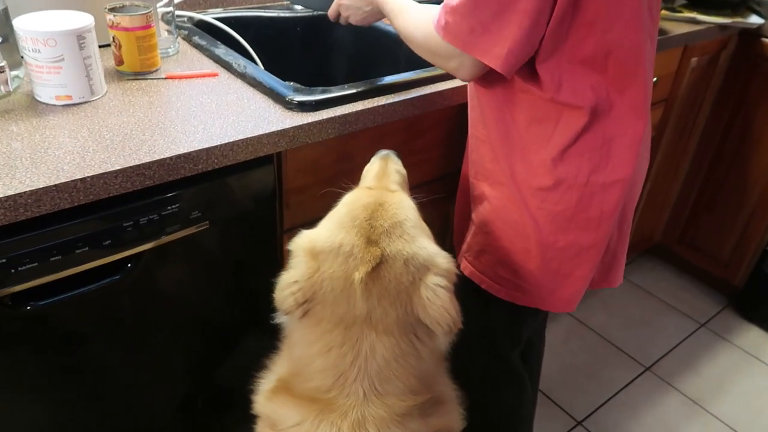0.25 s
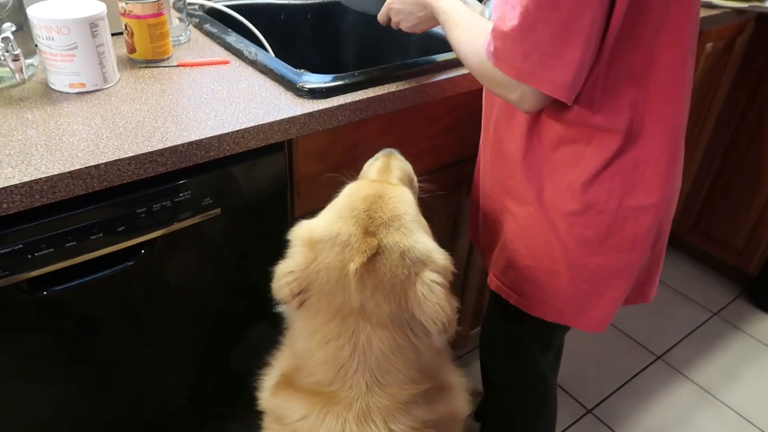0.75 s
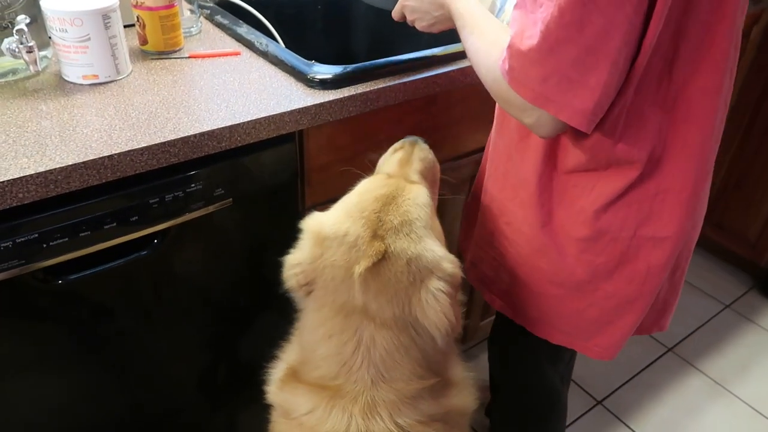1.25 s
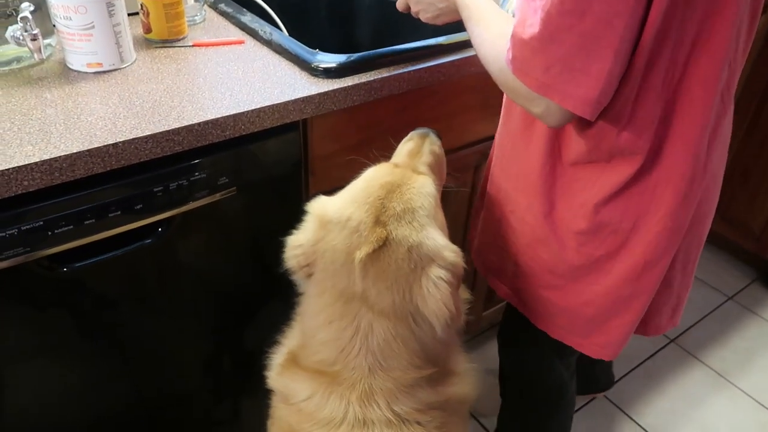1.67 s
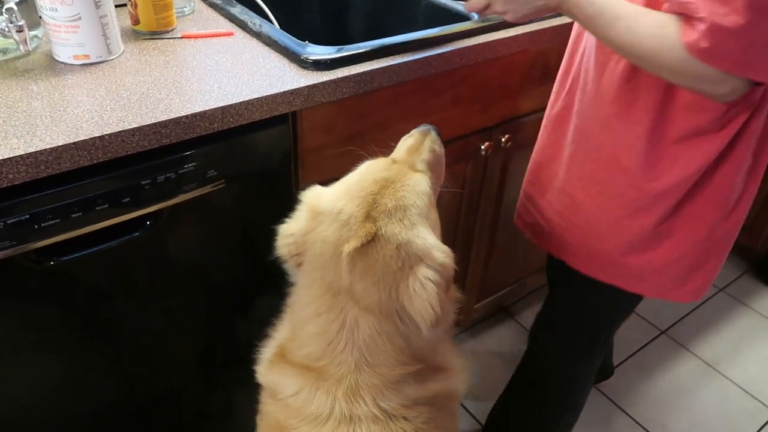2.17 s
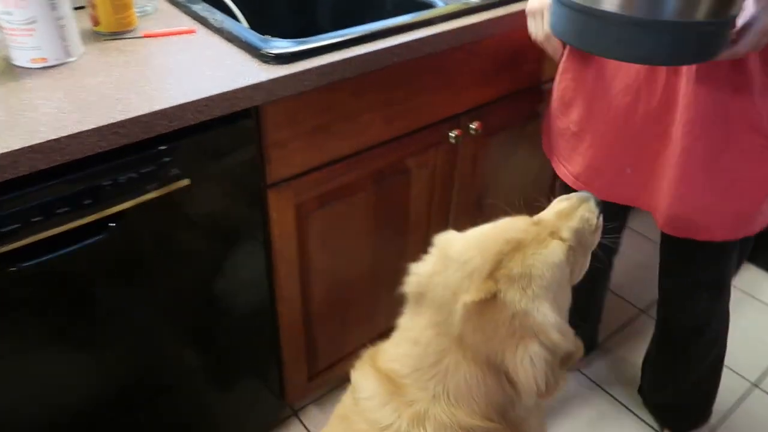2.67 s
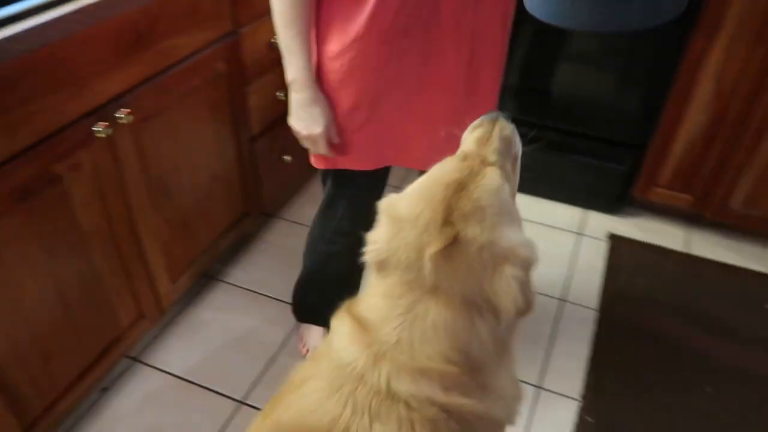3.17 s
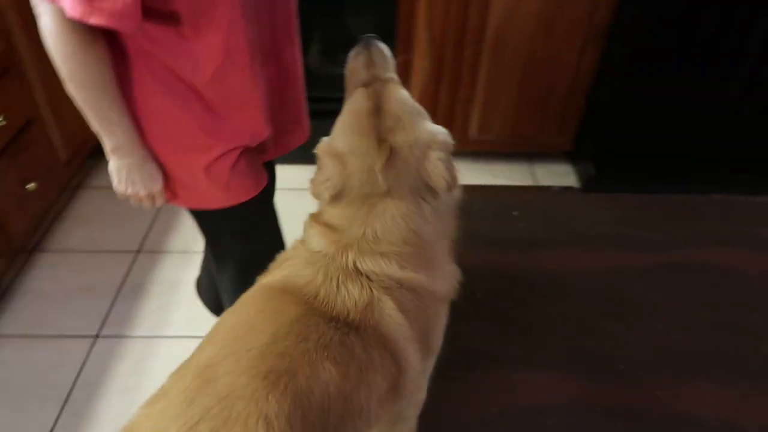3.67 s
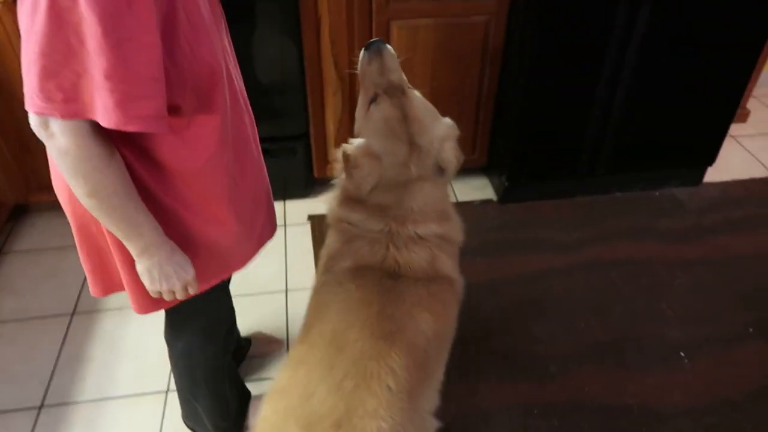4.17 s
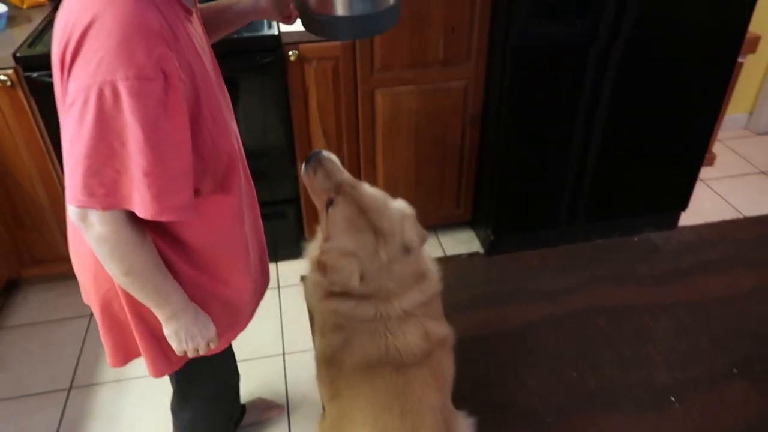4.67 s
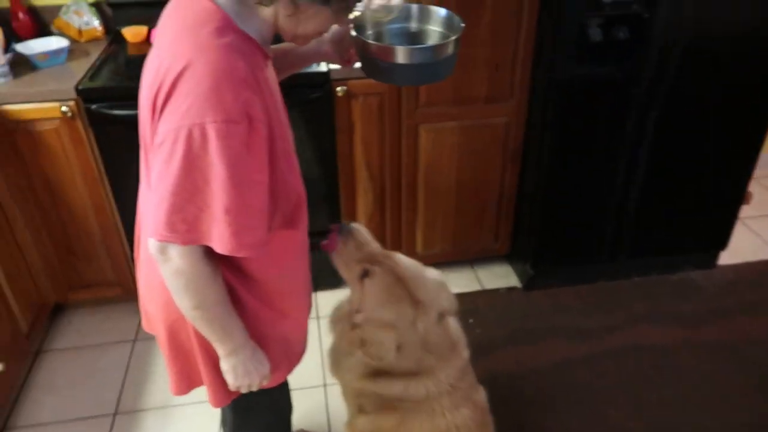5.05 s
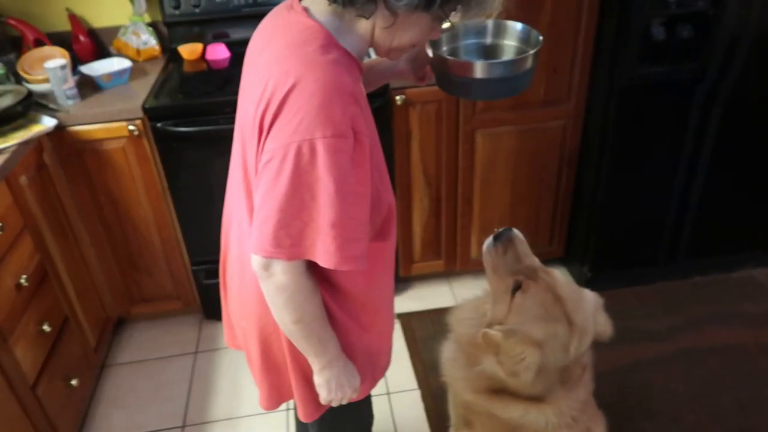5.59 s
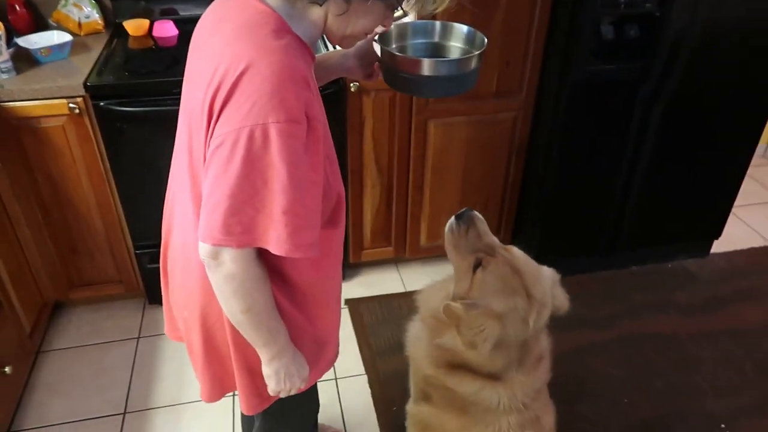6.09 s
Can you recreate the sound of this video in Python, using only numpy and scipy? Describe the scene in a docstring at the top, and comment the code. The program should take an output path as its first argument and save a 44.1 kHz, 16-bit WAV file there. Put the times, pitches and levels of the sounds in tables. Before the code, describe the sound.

A splashing tap cuts off almost at once, leaving a thin drain and a faint low ringing bowl tone. Steel rubs grittily along the sink, catches, skids and squeaks; a short pause, then two bright, hollow clanks, the second stronger. The rest is quiet: soft thuds of feet and paws, scuffs, swishing clothes, refrigerator hum and deep microphone rumble, with short reflections of a tiled kitchen, in wide stereo.

```python
"""A steel dog bowl scrapes and squeaks along a kitchen sink, then clanks twice against it as it is lifted out.
The scrape is filtered click noise, the squeak a wavering tone, each clank a set of fading tones with a rattle.
At first a tap splashes into the bowl (grainy noise) and is shut off. Bare feet and a dog's paws pad and scuff
over the tiles (short tones and noise bursts); cloth and fur rustle (soft noise). A refrigerator hums (sine
and noise) over a deep rumble (low noise); echoes of a small hard room follow all but these two."""
import sys
import numpy as np
from scipy import signal
from scipy.fft import rfft, irfft, next_fast_len
from scipy.io import wavfile
from scipy.ndimage import uniform_filter1d, map_coordinates

SR = 44100
rng = np.random.default_rng(int(sys.argv[2]) if len(sys.argv) > 2 else 0)


def log_audio(samples):
    """Write samples as a 16-bit WAV file to the path given in sys.argv[1]."""
    # one column per channel
    frames = np.atleast_2d(samples).T
    # limit to full scale, then quantise
    limited = np.clip(frames, -1, 1)
    pcm = np.round(limited * 32767).astype(np.int16)
    wavfile.write(sys.argv[1], SR, pcm)


N = 278844

# the bowl lands rim first and rebounds once:
# t/s, rim level/dB, body level/dB, body tilt/(dB per octave), flight/s, rebound level/dB
CLANKS = [(2.191, -18, -12, 0.8, 0.037, -7), (2.351, -8.5, -10, 1, 0.054, -14)]
# light touches around the second clank: t/s, level/dB, tilt/(dB per octave)
GRAZES = [(2.29, -42, 6.5), (2.339, -22.5, 0.5), (2.459, -32, 7.5), (2.467, -22, -4)]
# tones of bowl and sink together: f/Hz, level when flat/dB, level when tipped/dB
STEEL_TONES = [(169, -8, -14), (284, 2.5, -5), (357.7, 3, -3), (484, -9.5, -3.5), (613.5, -6, -5.5),
               (720, 3.5, 4.5), (823, -3, -6.5), (883, -7, -1), (934, -4, -0.5), (1497, -16, -14),
               (1739, -15, -14), (1906, -19, -8.5), (2235, -10.5, -17), (3020, -27, -18), (5200, -33, -23),
               (6100, -22, -18.5), (7500, -18.5, -21), (13590, -22, -31)]
# colour of the sheet-metal rattle: f/Hz, level/dB
CLATTER_COLOUR = [(70, -34), (230, 1.5), (750, 3.5), (1250, -3), (2000, -5.5), (4000, -12), (8500, -30.5),
                  (10500, -23), (15500, -42)]
TIPPED_S = 2.32  # the bowl is tipped in the hand after this moment
BODY_LAG_S = 0.0035  # the body rings this long after the rim lands

# the wet rim sticks and slips: t/s, length/s, highest mean pitch f/Hz, level/dB
SQUEAKS = [(1.271, 0.0333, 1958, -19.5), (1.4, 0.054, 2000, -38)]
# partials of the squeak: multiple of the pitch, level/dB
SQUEAK_PARTIALS = [(1, 1.5), (3, 6.5), (4, -5), (6, 3), (7, -3)]
# the rim rings on as it comes free
LIFT_HZ, LIFT_RING_DB, LIFT_T60_S = 4570, -49, 0.22

# pushes of the bowl along the sink: t/s, rise/s, level/dB
PUSHES = [(0.655, 0.007, -34.5), (0.782, 0.031, -32), (0.864, 0.027, -27), (1.271, 0.0052, -33)]
# each push dies away; the rubbing ends as the bowl lifts off
COAST_DB_PER_S, LIFT_S, LIFT_DB_PER_S = 38.5, 1.502, 296
# colour of steel sliding on the sink: f/Hz, level/dB
RASP_COLOUR = [(150, -12), (650, -1), (950, -6), (3200, -2), (4500, -4), (7300, -3.5), (9000, -17.5),
               (11500, -6), (15500, -38)]
# the rim catches and grates: t/s, level/dB
CATCHES = [(1.052, -17), (1.071, -22), (1.094, -23), (1.107, -21.5)]
# resonances of the rim: f/Hz, width/Hz, level/dB
RIM_RESONANCES = [(1630, 580, -11), (2480, 190, -3.5), (3020, 260, 1), (4020, 1030, -7.5), (5400, 1300, -9),
                  (6980, 630, -4.5), (10640, 780, -12)]
# the last catch skids to a stop, its pitch sinking
SKID_S, SKID_LENGTH_S, SKID_FROM_HZ, SKID_TO_HZ, SKID_DB = 1.109, 0.026, 3200, 1146, -28

# one low tone of the bowl, set going by the jet
SING_HZ, SING_DB, SING_T60_S = 588, -45, 3.4

# the jet runs at full flow until the tap is shut; the last water then drains away
JET_DB, SHUT_S, SHUT_DB_PER_S = -31, 0.16, 240
DRAIN_DB, DRAIN_DB_PER_S = -47.5, 19
# colour of the splash: f/Hz, level/dB
SPLASH_COLOUR = [(100, 0), (1000, 5), (2500, 5), (4000, 1.5), (7000, 1), (9000, -6), (11500, -2),
                 (15500, -25)]

# soft knocks of tap handle, bowl, feet and paws: t/s, ring level/dB, body f/Hz, puff level/dB
THUDS = [(0.094, -35, 299, -38.5), (0.181, -34, 597, -32.5), (0.199, -31.5, 350, -35),
         (0.222, -30, 113, -42), (0.572, -38.5, 372, -46.5), (0.882, -49, 570, -41.5),
         (3.347, -41.5, 623, -42.5), (3.499, -38.5, 727, -42.5), (3.721, -30.5, 609, -39),
         (3.748, -38, 694, -42.5), (4.11, -40, 770, -36.5), (4.541, -28.5, 823, -32),
         (4.573, -31.5, 730, -37), (4.632, -32, 370, -38.5), (4.683, -34.5, 701, -43),
         (4.873, -38, 803, -45), (5.146, -36, 663, -40.5), (5.205, -38, 1193, -38),
         (5.592, -35.5, 580, -38.5), (6.142, -42.5, 1155, -34.5), (6.187, -30, 475, -38.5),
         (6.262, -37, 371, -58)]
# colour of the dull puff in a knock: f/Hz, level/dB
THUD_COLOUR = [(60, -51), (350, 9), (800, 6), (3000, -7.5), (4500, -18), (11000, -26), (13000, -65)]
# brushes of rim, soles, claws and cloth, and one dribble of water just after the tap is shut, # levels before a
# shared gain: t/s, level/dB, body f/Hz, resonance level/dB, treble level/dB
SCUFFS = [(0.255, -26.5, 2670, 3, -9), (2.64, -23, 4470, 0.5, 20), (2.662, -30, 3040, -1, -2),
          (2.961, -32.5, 2260, 4, 13), (3.02, -26.5, 1380, 10, -21), (3.042, -22.5, 6500, 3.5, 9),
          (3.272, -30, 1297, -1, -41), (3.407, -32.5, 2700, 1, 10), (3.717, -28.5, 1710, 9.5, -3),
          (3.747, -33, 3900, 8, 17), (4.138, -23.5, 2060, 4.5, -12), (4.208, -20.5, 1150, 2.5, -23.5),
          (4.529, -30, 3400, 9.5, -16), (4.635, -31.5, 1500, -5, 2), (4.871, -25, 1930, 14, -25),
          (5.622, -37.5, 2860, 16, -4), (5.69, -31, 2510, 4.5, -5)]
# shared colour of the brushes: f/Hz, level/dB
SCUFF_COLOUR = [(150, -64), (600, 2), (2300, 4), (4000, -3.5), (7000, -7), (9000, -19.5), (11000, -4.5),
                (13500, -75)]

# the rustle is fullest between these two moments and slowly weaker on either side
FULL_FROM_S, FULL_UNTIL_S, RUSTLE_DB, RUSTLE_FADE_DB_PER_S = 3.5, 4.4, -45, 1.5
# colour of the low rustle: f/Hz, level/dB
RUSTLE_COLOUR = [(40, -22), (150, 6.5), (330, 7), (2300, -11), (11000, -37), (13000, -70)]
# colour of the cloth hiss: f/Hz, level/dB
CLOTH_COLOUR = [(1000, 1), (11000, -2), (13000, -71)]
# clothes swish with a stride: middle t/s, level/dB
SWISHES = [(3.17, -48.5), (3.61, -45.5), (4.81, -50.5)]
SWISH_FADE_S = 0.057  # time constant on either side of the middle

HUM_HZ, HUM_DB = 118.7, -52.5
LOUDER_S, LOUDER_DB = 3.72, 3.5  # the hum steps up by this much here
# colour of the fan air: f/Hz, level/dB
AIR_COLOUR = [(60, -53), (200, 1.5), (350, -8), (600, -43), (1200, -20), (3000, -24.5), (10500, -33.5),
              (13000, -51)]
RUMBLE_DB, LULL_S, LULL_DB = -49.5, (1.48, 2.46), -6.5  # the rumble, and a dip in it from-to
# colour of the deep rumble: f/Hz, level/dB
RUMBLE_COLOUR = [(20, -33), (50, -0.5), (75, -9.5), (110, -7), (500, -43.5)]

# how long the room rings: f/Hz, time to fall by 60 dB/s
ROOM_T60 = [(150, 0.45), (7000, 0.31), (14000, 0.23)]
# stereo width: f/Hz, side minus mid level/dB, before the room's and sources' own balance
STEREO_WIDTH = [(40, -54), (200, -9), (1000, -8), (4400, -4.5), (8000, 2.5), (12000, 12.5)]
TOP_HZ = 15730  # nothing is kept from here up


def clanks(attack=0.0019, ring_t60=0.21, treble_hold=0.086, flutter_db=1.0, twin_db=-6):
    """Each blow rings the steel's tones, as beating pairs, over a short rattling clatter of sheet metal."""
    out, t = np.zeros(N), np.arange(SR // 2) / SR
    hz, flat_db, tipped_db = np.transpose(STEEL_TONES)[:, :, None]
    t60 = ring_t60 * (hz / 1000) ** treble_hold  # the hand damps the low tones most
    unrest = np.sqrt(hz / 8000)  # high tones waver most

    def drift():
        return unrest * np.array([wobble(60, len(t)) for _ in STEEL_TONES])

    for s, ring_db, clatter_db, slope_db, clatter_t60 in blows():
        mode_db = tipped_db if s > TIPPED_S else flat_db
        twin_hz = hz * (1 + 0.014 * rng.standard_normal(hz.shape))
        main_tone = np.sin(2 * np.pi * hz * t + drift())
        twin_tone = np.sin(2 * np.pi * twin_hz * t + drift())
        pairs = main_tone + amp(twin_db) * twin_tone
        fading = amp(mode_db + flutter_db * drift() - 60 * t / t60)
        ring = np.sum(fading * pairs * tilt(hz, slope_db), axis=0)
        rattle = patchy(grit(len(t), rate=350, depth_db=1.5), depth_db=3.5, size=1024)
        clatter = unit(filtered(rattle, lambda f: amp(along(CLATTER_COLOUR, f)) * tilt(f, slope_db)))
        blow = amp(ring_db - 7.5) * ring + amp(clatter_db - 60 * t / clatter_t60) * clatter
        add(out, s, blow * (1 - np.exp(-t / attack)))
    return out


def blows(rim_ring_db=-11, rim_tilt_db=1.0, rim_t60=0.057, body_clatter_db=-5.0, body_t60=0.16,
          rebound_clatter_db=-4):
    """List the contacts of each clank: the rim cracks, the body rings, the rebound rattles."""
    # t/s, ring level/dB, clatter level/dB, tilt/(dB per octave), clatter t60/s
    rows = [(s, db + rim_ring_db, db, slope_db, body_t60) for s, db, slope_db in GRAZES]
    for s, rim_db, body_db, slope_db, flight, rebound_db in CLANKS:
        back_db = body_db + rebound_db
        body_s = s + BODY_LAG_S
        rows += [(s, rim_db + rim_ring_db, rim_db, rim_tilt_db, rim_t60),
                 (body_s, body_db, body_db + body_clatter_db, slope_db, body_t60),
                 (body_s + flight, back_db, back_db + rebound_clatter_db, slope_db, body_t60)]
    return rows


def squeak(sizzle_db=-3, rise=0.025, release_db_per_s=330, slack=0.02):
    """The wet rim sticks and slips: an unsteady shrill tone, highest in mid-stroke, with a high sizzle."""
    out = np.zeros(N)

    def highs(f):
        lower = resonance(f, 6500, 1050) - resonance(f, 7440, 390)
        return lower + 0.5 * resonance(f, 10300, 900) - 0.11 * resonance(f, 15200, 900)

    loudest_db = max(row[-1] for row in SQUEAKS)
    for s, length, hz, level_db in SQUEAKS:
        pressure = np.sin(np.pi * np.minimum(since(s) / length, 1))
        pitch_hz = hz * (1 - slack * (1 - pressure))
        phase = 2 * np.pi * np.cumsum(pitch_hz * (1 + 0.011 * wobble(600))) / SR
        # under light pressure the low partials fade and the shrill ones remain
        grip_db = 1.1 * (level_db - loudest_db)
        tone = unit(sum(amp(db + grip_db / k + 1.3 * wobble(220)) * np.sin(k * phase)
                        for k, db in SQUEAK_PARTIALS))
        sizzle = unit(filtered(patchy(rng.standard_normal(N), depth_db=4), highs))
        gain = amp(level_db) * stroke(s, rise, length, release_db_per_s)
        out += gain * (tone + amp(sizzle_db) * sizzle)
    return out


def lift_ring():
    """The rim comes free and rings on as one fading tone."""
    free = since(LIFT_S)
    return amp(LIFT_RING_DB - 60 * free / LIFT_T60_S) * np.sin(2 * np.pi * LIFT_HZ * free)


def scrape(catch_t60=0.21):
    """Steel slides grittily over the sink; where the rim catches, its resonances grate."""
    power = sum((amp(db) * stroke(s, rise, rise, COAST_DB_PER_S)) ** 2 for s, rise, db in PUSHES)
    effort = np.sqrt(power)
    friction = patchy(slips(N, rate=1800, spread_db=3), depth_db=3.6)
    slide = unit(filtered(friction, lambda f: amp(along(RASP_COLOUR, f))))
    t = np.arange(SR // 4) / SR
    catch_power = np.zeros(N)
    for s, db in CATCHES:
        add(catch_power, s, amp(db - 60 * t / catch_t60) ** 2)

    def rim(f):  # neighbouring resonances have opposite signs
        return sum((-1) ** k * amp(db) * resonance(f, hz, width)
                   for k, (hz, width, db) in enumerate(RIM_RESONANCES))

    chatter = patchy(grit(N, rate=600, depth_db=2.5), depth_db=2.5)
    grating = np.sqrt(catch_power) * unit(filtered(chatter, rim))
    return slide * effort * amp(-LIFT_DB_PER_S * since(LIFT_S)) + grating


def skid(fall_s=0.019):
    """Ragged stick and slip that slows down as the rim comes to rest."""
    pitch_hz = SKID_TO_HZ + (SKID_FROM_HZ - SKID_TO_HZ) * np.exp(-since(SKID_S) / fall_s)
    phase = 2 * np.pi * np.cumsum(pitch_hz) / SR
    rasp = wobble(500) * np.sin(phase + 1.5 * wobble(700))
    return amp(SKID_DB) * unit(rasp) * stroke(SKID_S, 0.0027, SKID_LENGTH_S, 350)


def sing():
    """The jet has set one low tone of the bowl singing; it fades slowly."""
    t = np.arange(N) / SR
    return amp(SING_DB - 60 * t / SING_T60_S) * np.sqrt(2) * np.sin(2 * np.pi * SING_HZ * t)


def tap():
    """The jet splashes in the bowl until the tap is shut; the last water drains away."""
    drops = patchy(grit(N, rate=1100, depth_db=3), depth_db=2.5)
    splash = unit(filtered(drops, lambda f: amp(along(SPLASH_COLOUR, f))))
    jet = amp(JET_DB - SHUT_DB_PER_S * since(SHUT_S))
    drain = amp(DRAIN_DB - DRAIN_DB_PER_S * since(SHUT_S))
    return splash * np.hypot(jet, drain)


def thuds(attack=0.0022, ring_t60=0.084, puff_t60=0.26, waver=1.33):
    """Soft knocks: the struck body rings briefly and unsteadily under a dull puff."""
    out, t = np.zeros(N), np.arange(SR // 3) / SR
    for s, ring_db, body_hz, puff_db in THUDS:
        ring = unit(np.sin(2 * np.pi * body_hz * t + waver * wobble(body_hz / 5, len(t))))
        clicks = slips(len(t), rate=3000, spread_db=2)
        puff = unit(filtered(clicks, lambda f: amp(along(THUD_COLOUR, f))))
        add(out, s, amp(ring_db) * ring * burst(t, attack, ring_t60))
        add(out, s, amp(puff_db) * puff * burst(t, attack, puff_t60))
    return out


def scuffs(gain_db=-9.0, attack=0.0041, t60=0.16, width_octaves=0.19):
    """Brushing contacts and one dribble of water: short gritty bursts, each with a resonance at its own body
    pitch."""
    out, t = np.zeros(N), np.arange(SR // 3) / SR
    for s, db, body_hz, body_db, treble_db in SCUFFS:
        def colour(f):
            hump = np.exp(-(np.log2((f + 1) / body_hz) / width_octaves) ** 2)
            return amp(along(SCUFF_COLOUR, f) + treble_db * f / (f + 3000) + body_db * hump)

        grains = patchy(slips(len(t), rate=3500, spread_db=2), depth_db=2.5)
        add(out, s, amp(db + gain_db) * unit(filtered(grains, colour)) * burst(t, attack, t60))
    return out


def tick(s=5.063, db=-30, t60=0.0019, centre_hz=6000):
    """One tiny dry tick: a very short burst of noise through one broad resonance."""
    out, t = np.zeros(N), np.arange(SR // 20) / SR
    noise = rng.standard_normal(len(t))
    snap = unit(filtered(noise, lambda f: resonance(f, centre_hz, centre_hz / 2)))
    add(out, s, amp(db - 60 * t / t60) * snap)
    return out


def shuffle(cloth_db=-64):
    """Fur, clothes and feet rustle as soft noise; now and then a stride swishes."""
    t = np.arange(N) / SR
    outside_s = np.maximum(FULL_FROM_S - t, 0) + since(FULL_UNTIL_S)
    rustle = patchy(grit(N, rate=60, depth_db=1.8), depth_db=3.3)
    low = unit(filtered(rustle, lambda f: amp(along(RUSTLE_COLOUR, f))))
    hiss = unit(filtered(rng.standard_normal(N), lambda f: amp(along(CLOTH_COLOUR, f))))
    swish = sum(amp(db) * np.exp(-np.abs(t - s) / SWISH_FADE_S) for s, db in SWISHES)
    rubbing = low * amp(RUSTLE_DB) + hiss * amp(cloth_db)
    return rubbing * amp(-RUSTLE_FADE_DB_PER_S * outside_s) + hiss * swish


def fridge(air_db=-52):
    """A compressor hum, one tone of wavering level, with fan air as noise."""
    t = np.arange(N) / SR
    louder_db = np.where(t > LOUDER_S, LOUDER_DB, 0)
    hum = amp(HUM_DB + louder_db + wobble(2.56)) * np.sqrt(2) * np.sin(2 * np.pi * HUM_HZ * t)
    return hum + amp(air_db) * wide_noise(AIR_COLOUR)


def rumble(lull_edge_s=0.085):
    """A deep microphone rumble, low noise that dips for a second."""
    t = np.arange(N) / SR
    lull = np.clip(np.minimum(t - LULL_S[0], LULL_S[1] - t) / lull_edge_s + 0.5, 0, 1)
    return amp(RUMBLE_DB + LULL_DB * lull) * wide_noise(RUMBLE_COLOUR)


def kitchen(x, wet_db):
    """Mid and side: the direct sound and its reflections from tiles and cupboards, a fading noise tail."""
    hz, t, z = signal.stft(rng.standard_normal((2, SR // 2)), SR, nperseg=256)
    fade = amp(-60 * t / along(ROOM_T60, hz)[:, None]) * (t > 0)
    tail = signal.istft(z * fade, SR, nperseg=256)[1]
    echo = signal.fftconvolve(x[None], tail / np.linalg.norm(tail[0]), axes=1)[:, :N]
    mid, side = (x + amp(wet_db) * echo) / np.sqrt(1 + amp(wet_db) ** 2)
    # the difference between two close ports grows with frequency, nearly a quarter cycle off their sum
    return np.array([mid, filtered(side, lambda f: np.exp(1j * np.pi / 2.24) * f / (f + 700))])


def wide_noise(colour):
    """Steady coloured noise, drawn separately for mid and side."""
    return unit(filtered(rng.standard_normal((2, N)), lambda f: amp(along(colour, f))))


def amp(db):
    """Decibels to gain."""
    return 10 ** (np.asarray(db) / 20)


def unit(x):
    """Scale to an rms (average strength) of 1."""
    return x / np.sqrt(np.mean(x ** 2) + 1e-20)


def along(points, hz):
    """Read (f/Hz, value) points on a log frequency axis."""
    f, v = np.transpose(points)
    return np.interp(np.log(hz + 1), np.log(f + 1), v)


def wobble(rate, size=N):
    """A smooth random curve through rate random points a second."""
    knots = rng.standard_normal(int(size * rate / SR) + 4)
    coarse = np.arange(0, size + 8, 8)  # worked out at every eighth sample, straight lines between
    return np.interp(np.arange(size), coarse, map_coordinates(knots, [coarse * rate / SR]))


def filtered(x, response):
    """Shape the spectrum of x by a function of frequency."""
    n = x.shape[-1]
    m = next_fast_len(n + 8192)
    return irfft(rfft(x, m) * response(np.fft.rfftfreq(m, 1 / SR)), m)[..., :n]


def resonance(f, hz, width):
    """Response of one damped tone of a body, 1 at its centre."""
    return 1j * f * width / (hz * hz - f * f + 1j * f * width)


def tilt(hz, slope_db):
    """Brighten or dull by so many dB per octave around 1 kHz, level below 250 Hz."""
    return amp(slope_db * np.log2(np.maximum(hz, 250) / 1000))


def grit(size, rate, depth_db):
    """Noise that comes in tiny uneven grains."""
    return unit(rng.standard_normal(size) * amp(depth_db * wobble(rate, size)))


def slips(size, rate, spread_db):
    """Separate tiny clicks of uneven size at random moments, about rate a second."""
    hit = rng.random(size) < rate / SR
    sign = np.sign(rng.standard_normal(size))
    return unit(hit * sign * amp(spread_db * np.clip(rng.standard_normal(size), -2, 2)))


def patchy(x, depth_db, size=512):
    """Narrow bands swell and fade at random, as when a contact point wanders."""
    z = signal.stft(x, nperseg=size)[2]
    across_bands = uniform_filter1d(rng.standard_normal(z.shape), size=3, axis=0)
    field = uniform_filter1d(across_bands, size=7, axis=1)
    return signal.istft(z * amp(depth_db * unit(field)), nperseg=size)[1][:len(x)]


def since(s):
    """Seconds gone by since s, zero before it."""
    return np.maximum(np.arange(N) / SR - s, 0)


def stroke(s, rise, length, fade_db_per_s):
    """Gain that rises from s on and starts to fade once its length is over."""
    return np.minimum(since(s) / rise, 1) * amp(-fade_db_per_s * since(s + length))


def burst(t, attack, t60):
    """Gain that swells to 1 and dies away."""
    shape = (1 - np.exp(-t / attack)) * amp(-60 * t / t60)
    return shape / shape.max()


def add(track, s, sound):
    """Mix a sound in at s seconds."""
    part = track[round(s * SR):][:len(sound)]
    part += sound[:len(part)]


def scene():
    """All sources in the room; the stereo image widens toward the treble."""
    sound = kitchen(clanks(), wet_db=-9.5)
    sound = sound + kitchen(squeak() + lift_ring() + scrape() + skid() + tap(), wet_db=-7)
    sound = sound + kitchen(thuds() + scuffs() + shuffle(), wet_db=-4.5)
    sound = sound + kitchen(sing() + tick(), wet_db=-24) + fridge() + rumble()

    def balance(f):
        turn = np.arctan(amp(along(STEREO_WIDTH, f)))
        return np.array([np.cos(turn), np.sin(turn)])

    mid, side = filtered(sound, balance)
    return np.array([mid + side, mid - side])


def record(dry):
    """Keep only what lies below the top frequency."""
    return filtered(dry, lambda f: f < TOP_HZ)


dry = scene()
out = record(dry)
log_audio(out)
```